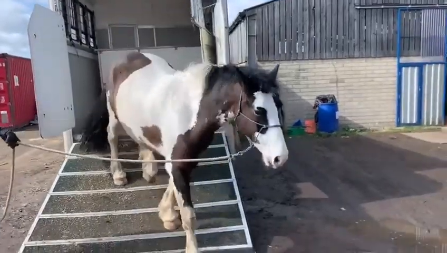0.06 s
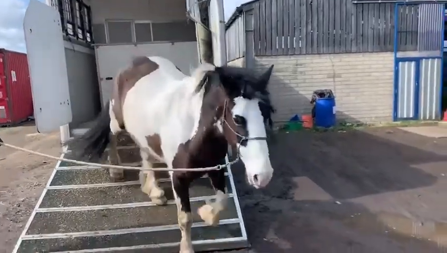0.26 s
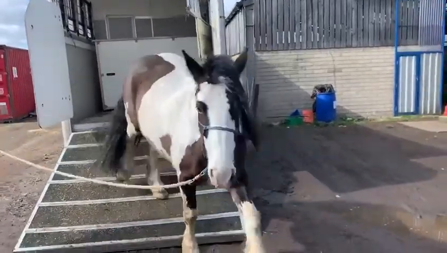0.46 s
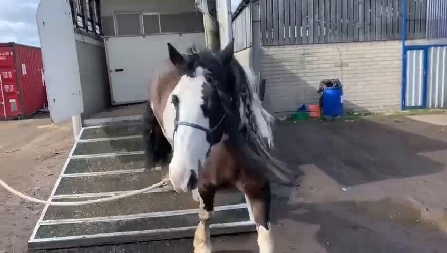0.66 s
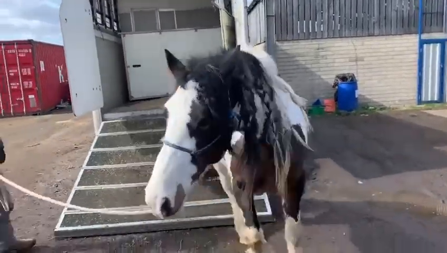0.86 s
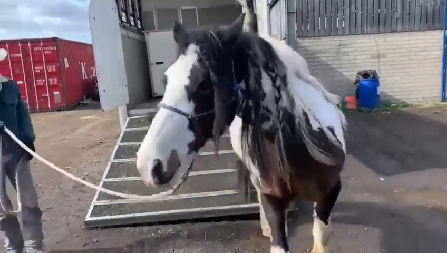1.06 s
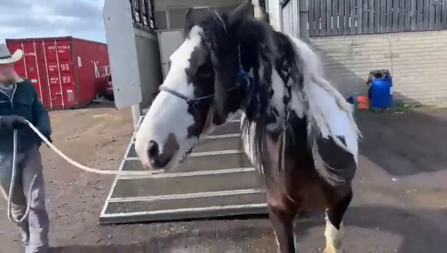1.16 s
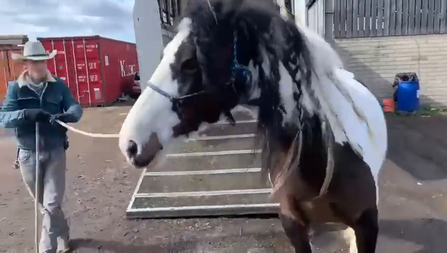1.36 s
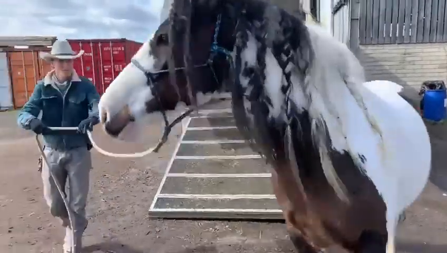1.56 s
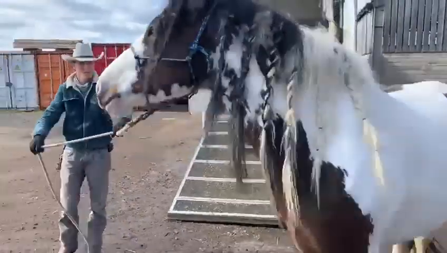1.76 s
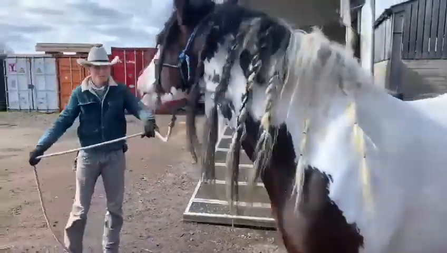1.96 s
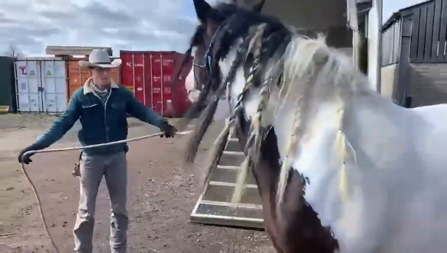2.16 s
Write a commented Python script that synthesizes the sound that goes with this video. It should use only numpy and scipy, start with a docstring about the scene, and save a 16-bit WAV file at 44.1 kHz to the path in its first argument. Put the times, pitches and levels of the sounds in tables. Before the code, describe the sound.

Heavy horse hooves leaving a trailer ramp, close by outdoors. After faint grit, a loud hollow boom with a thud and stone crack at 0.2 s. The ramp trembles and grit scrapes around 0.3-0.5 s; a short knock at 0.6, a soft step at 0.87. A second deep double boom comes at 1.04, then hoof thuds at 1.17, 1.43 and 1.7, and a light scuff at 1.9, over low rumble with short dull echoes.

```python
"""A trailer ramp booms under the hind hooves of a heavy horse walking off it on to a gritty yard, close by.
The ramp is a bank of damped modes driven by blows and a tremble; hooves thump as damped falling tones.
Grit crunches as many short ringing grains, and single stones crack as very short rings.
Filtered noise makes the low outdoor rumble, and dull echoes follow.
Phase and level between left and right vary with frequency, giving the stereo with a wide mid band."""
import sys
import numpy as np
from scipy import signal
from scipy.fft import rfft, irfft
from scipy.io import wavfile

SR = 44100
rng = np.random.default_rng(int(sys.argv[2]) if len(sys.argv) > 2 else 0)


def materialize(psi):
    """Save the field psi as 16-bit PCM at rate SR to the path in sys.argv[1].

    A 1-D psi becomes a single channel; in a 2-D psi each row is a channel.
    """
    bounded = np.clip(np.atleast_2d(psi).T, -1, 1)
    quanta = np.round(bounded * 32767).astype(np.int16)
    wavfile.write(sys.argv[1], SR, quanta)


N = 97020
T = np.arange(N) / SR  # time, s


def amp(db):
    """Convert level to amplitude ratio: 20 dB is a factor of ten."""
    return 10 ** (np.asarray(db) / 20)


def rms_one(x):
    """Normalise the mean power, so that the rms is 1."""
    return x / np.sqrt(np.mean(x ** 2) + 1e-20)


def at_hz(points, hz, column=1):
    """Interpolate a spectrum linearly on a logarithmic frequency axis."""
    p = np.array(points)
    return np.interp(np.log(np.maximum(hz, 1)), np.log(p[:, 0]), p[:, column])


def colour(x, points):
    """Shape a steady signal by multiplying its spectrum by a response; rms 1."""
    response = amp(at_hz(points, np.fft.rfftfreq(N, 1 / SR)))
    return rms_one(irfft(rfft(x) * response, N))


def butter(x, hz, kind):
    """Filter with a maximally flat (Butterworth) response of design order 2."""
    return signal.sosfilt(signal.butter(2, hz, kind, fs=SR, output="sos"), x)


def drift(rate_hz):
    """Low-pass noise with two equal poles at rate_hz: a slow random fluctuation of rms about 1."""
    step = 40  # samples between the drawn points
    r = np.exp(-2 * np.pi * rate_hz * step / SR)
    draws = rng.standard_normal(N // step + 2002)
    slow = signal.lfilter([1], [1, -2 * r, r * r], draws)[2000:]  # without the start-up
    return np.interp(np.arange(N) / step, np.arange(len(slow)), rms_one(slow))


def ring(x, hz, t60):
    """Two-pole resonator: a unit impulse excites an exponentially damped sine of starting height 1."""
    r = amp(-60 / (t60 * SR))
    w = 2 * np.pi * hz / SR
    return signal.lfilter([0, np.sin(w)], [1, -2 * r * np.cos(w), r * r], x + 1e-18)


def ramp():
    """Modal superposition: where a blow lands sets how strongly it excites each mode of the panel."""
    # panel modes: hz, level_db struck mid-panel, level_db struck at the lip, t60_s
    modes = [(74.1, -6.5, -10, 0.25), (125.2, 1, -26, 0.094), (148.6, -6, 3, 0.081),
             (186.1, -9, -0.5, 0.14), (240, -7, -12.5, 0.095), (336.2, -15.5, -32, 0.19),
             (402, -20, -26, 0.058), (542.7, -24, -36, 0.064), (686.3, -22, -47, 0.12),
             (802, -24.5, -52, 0.17), (969, -29.5, -40, 0.23), (1228, -38, -56, 0.22)]
    # blows: start_s, level_db, place (0 panel to 1 lip), contact_ms
    blows = [(0.2027, -6.5, 0.033, 0.46), (0.229, -7, 0.038, 1.05), (0.244, -19.5, 0.034, 2.65),
             (.262, -20, 0.47, 0.67), (1.0367, -7.5, 0.71, 1.9), (1.0502, -10, 0.74, 1.3),
             (1.0563, -4.5, 0.38, 4), (1.081, -13.5, 0.4, 1.67), (1.202, -21, 0.75, 2.5)]
    # trembling under a dragged hoof: time_s, level_db
    tremble = [(0, -46), (.1, -44.5), (.3, -27.5), (.43, -37), (.5, -29), (.62, -38.5), (.8, -57),
               (.96, -38.5), (1.0, -32), (1.45, -40), (1.62, -54), (1.8, -42), (2.2, -63)]

    tremble_level = amp(np.interp(T, *np.transpose(tremble)))
    shake = tremble_level * rng.standard_normal(N) / np.sqrt(SR / 100)
    pushes = []
    for s, db, _, ms in blows:
        across = (T - s) * 2000 / ms - 1  # -1 to 1 during contact
        force = np.maximum(1 - across ** 2, 0) ** 2
        pushes.append(force * amp(db) * 2000 / ms / SR)  # impulse independent of contact length

    out = np.zeros(N)
    for k, (hz, panel_db, lip_db, t60) in enumerate(modes):
        drive = shake * amp(panel_db)
        for push, (_, _, place, _) in zip(pushes, blows):
            drive = drive + push * amp(panel_db + place * (lip_db - panel_db))
        out += (-1) ** k * ring(drive, hz, t60)  # neighbouring modes have opposite sign
    return out


def yard():
    """Broadband noise: low rumble and faint hiss in octave bands of independently drifting level; two draws."""
    # spectrum before overall scaling: hz, density_db (per hertz)
    spectrum = [(20, -28), (35, 4), (75, 6.5), (130, -7.5), (240, -11), (470, -19.5), (920, -21),
                (1400, -22.5), (3000, -29), (12000, -50.5)]
    level_db, patchy_db = -46.5, 3

    noise = np.array([colour(g, spectrum) for g in rng.standard_normal((2, N))])
    edges = 20 * 2 ** np.arange(0, 10.1)  # octave edges, Hz
    total = 0
    for k, (low_hz, high_hz) in enumerate(zip(edges, edges[1:])):
        band = butter(noise, [low_hz, high_hz], "band")
        total = total + band * amp(patchy_db * drift(3.5)) * (-1) ** k
    return amp(level_db) * rms_one(total)


def grains():
    """Granular noise: uneven random impulses, each exciting one of many damped resonances; rms 1."""
    # spectrum before overall scaling: hz, density_db (per hertz)
    spectrum = [(150, 5.5), (600, -5), (1000, -2.5), (1500, -10), (2000, -6.5), (4500, -9), (5500, -19.5),
                (6600, -8), (9000, -21), (12500, -5)]
    grains_per_s, spread_db = 25000, -0.5
    ring_cycles = 30.7  # cycles in one t60
    patch_db, patch_hz = 4, 30  # each pitch swells and thins by itself

    hits = rng.random(N) < grains_per_s / SR
    heights = amp(spread_db * np.minimum(rng.exponential(1, N), 4))
    clicks = hits * heights * rng.choice([-1, 1], N)
    pitches = np.geomspace(150, 13000, 40)  # Hz
    dealt = rng.integers(0, 40, N)  # which pitch a grain has
    total = 0
    for k, hz in enumerate(pitches):
        level = amp(at_hz(spectrum, hz) + patch_db * drift(patch_hz))
        # the factor hz offsets the shorter ringing of high pitches
        total = total + level * hz * ring(clicks * (dealt == k), hz, ring_cycles / hz)
    return rms_one(total)


def grit():
    """Friction on loose grains: each scuff is an envelope on granular noise, crunching; two draws."""
    # scuffs: start_s, level_db, rise_s, hold_s, t60_s, low_db (extra level of the part below 1.2 kHz)
    scuffs = [(0.056, -69, 0.0024, 0.021, 0.072, 28.5), (0.106, -41.5, 0.01, 0.0022, 0.2, 5.5),
              (0.1975, -24.5, 0.0036, 0.0062, 0.042, 14), (0.212, -42, 0.0061, 0.022, 0.12, 19),
              (0.337, -49, 0.097, 0.037, 0.16, 10.5), (0.429, -33, 0.02, 0.028, 0.13, -0.5),
              (0.585, -43, 0.0022, 0.019, 0.038, 4.5), (0.63, -64.5, 0.0046, 0.01, 0.78, 11.5),
              (0.661, -52.5, 0.085, 0.025, 0.037, 0), (0.873, -41.5, 0.0012, 0.0019, 0.2, 9),
              (0.971, -39, 0.026, 0.0049, 0.38, 1), (1.154, -29.5, 0.002, 0.0087, 0.017, 3),
              (1.223, -48, 0.019, 0.022, 0.18, 2), (1.326, -49, 0.016, 0.0087, 0.53, 8.5),
              (1.429, -39, 0.0034, 0.02, 0.29, 5), (1.7, -37, 0.0035, 0.0021, 0.073, 6),
              (1.747, -54, 0.046, 0.11, 0.65, 3.5), (1.88, -31, 0.02, 0.0093, 0.11, -4)]
    tail_db, tail_t60_s = -23.5, 0.85  # loose grit settling after a scuff
    crunch_db, crunch_hz = 2.2, 60

    both = np.array([grains(), grains()])
    low = butter(both, 1200, "low")
    high = both - low
    out = 0
    for s, db, rise, hold, t60, low_db in scuffs:
        onset = np.clip((T - s) / rise, 0, 1) ** 2
        after = np.clip(T - s - rise - hold, 0, None)
        decay = amp(-60 * after / t60) + amp(tail_db - 60 * after / tail_t60_s)
        out = out + onset * amp(db) * decay * (high + amp(low_db) * low)
    return out * amp(crunch_db * drift(crunch_hz))


def stones():
    """Impulse response: each lone stone cracks as one heavily damped resonance."""
    # cracks: time_s, level_db, pitch_hz
    cracks = [(.1235, -33, 5460), (.2035, -10, 3200), (.596, -23, 5300), (0.8717, -28, 4000),
              (1.162, -22.5, 4370), (1.282, -38, 7240), (1.704, -25, 11300)]
    t60_s = 0.003
    out = 0
    for s, db, hz in cracks:
        impulse = amp(db) * (np.arange(N) == int(s * SR))
        out = out + ring(impulse, hz, t60_s)
    return out


def thumps():
    """Damped vibration: each hoof gives a falling tone and an inharmonic overtone that dies sooner."""
    # thumps and knocks: start_s, level_db, settled_hz, t60_s, overtone_db at the start
    hooves = [(.124, -24, 223, 0.062, 0), (0.2005, 4.5, 179.8, 0.072, -20), (0.5945, -6.5, 742, 0.011, -24),
              (.602, -14, 244, 0.022, -3.5), (.648, -30.5, 688, .04, -7), (.871, -13.5, 184, 0.033, -6.5),
              (1.0335, -16.5, 208, 0.032, -0.5), (1.167, -5.5, 231, 0.04, -4.5),
              (1.4331, -10.5, 215, 0.029, -17), (1.45, -14, 962, 0.021, -18), (1.459, -26, 965, .04, -23),
              (1.471, -23.5, 944, 0.032, -21), (1.7034, -17, 287, 0.012, -6),
              (1.736, -16.5, 251, 0.023, -4.5), (1.898, -24, 1155, 0.066, -3)]
    overtone_ratio, rise_s = 2.413, 0.0058
    fall_hz, fall_s = 458, 0.0018  # starting excess of frequency and its time constant

    out = np.zeros(N)
    for s, db, hz, t60, over_db in hooves:
        t = np.maximum(T - s, 0)
        fall = fall_hz * fall_s * (1 - np.exp(-t / fall_s))  # extra phase, cycles
        low_tone = np.sin(2 * np.pi * (hz * t + fall))
        overtone = np.sin(2 * np.pi * (overtone_ratio * hz * t + fall))
        tone = low_tone + amp(over_db - 30 * t / t60) * overtone
        out += amp(db - 60 * t / t60) * (1 - np.exp(-t / rise_s)) * tone
    return out


def scene():
    """Superposition of sources and delayed, low-passed reflections; an opposite-phase mid band gives width."""
    # echoes off trailer and walls: delay_s, level_db
    reflections = [(0.022, -19.5), (0.035, -22.5)]
    echo_cut_hz = 3500
    wide_db = -9.5  # level of the second noise draw
    wide_band_hz = [770, 5640]  # band of the opposite-phase noise and echoes

    blows = ramp() + thumps() + stones()
    noise = grit() + yard()
    near = blows + noise[0]
    echoes = []
    for s, db in reflections:
        delayed = np.concatenate([np.zeros(int(s * SR)), near])[:N]
        echoes.append(amp(db) * butter(delayed, echo_cut_hz, "low"))
    difference = amp(wide_db) * noise[1] + echoes[0] - echoes[1]
    wide = butter(difference, wide_band_hz, "band")
    return near + sum(echoes) + wide * np.array([[1], [-1]])


def record(dry):
    """Left-right phase and level that vary with frequency, dispersion delaying the lows, and band limits."""
    # left against right: hz, phase_rad between them, left_minus_right_db
    left_right_points = [(465, 0.18, 0), (930, 0.56, 1.2), (3100, 2.06, -1), (5300, 1.16, -5.5),
                         (7300, 1.14, -0.5), (7260, 2.11, 3.5), (9140, 3.68, 0), (10940, 6.64, -0.5)]
    bass_lag_cycles = 0.5  # delay in cycles of each frequency above 40 Hz
    bass_cut_hz, treble_cut_hz = 36, 12800

    hz = np.fft.rfftfreq(N, 1 / SR) + 1
    points = [(200, 0, 0)] + left_right_points  # no added difference in the bass
    # each side takes half of the difference
    half = np.exp(.5j * at_hz(points, hz)) * amp(at_hz(points, hz, column=2) / 2)
    lag = np.exp(-2j * np.pi * bass_lag_cycles * np.log(np.maximum(hz, 40) / 20000))
    out = irfft(rfft(dry, axis=1) * lag * np.array([half, 1 / half]), N, axis=1)
    out = butter(butter(out, bass_cut_hz, "high"), bass_cut_hz, "high")
    return signal.sosfilt(signal.cheby2(12, 70, treble_cut_hz, fs=SR, output="sos"), out)


dry = scene()
out = record(dry)
materialize(out)
```